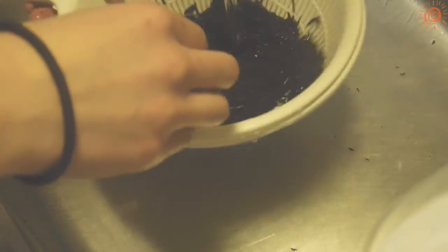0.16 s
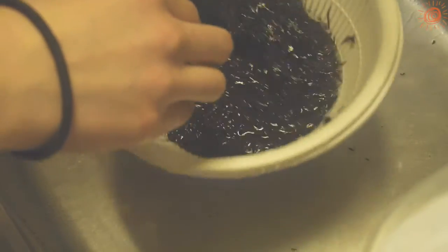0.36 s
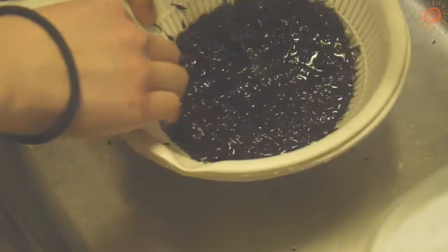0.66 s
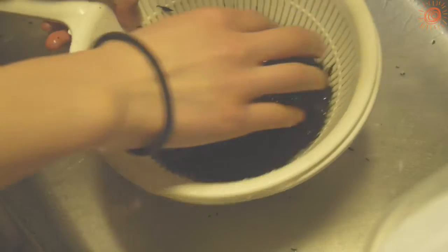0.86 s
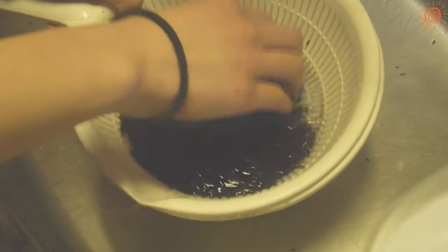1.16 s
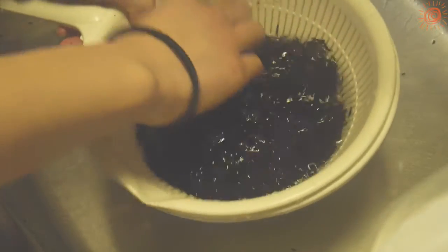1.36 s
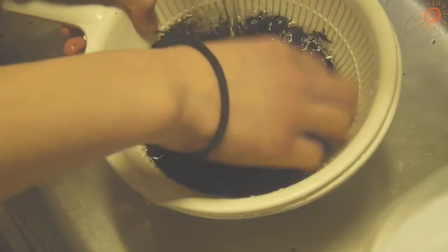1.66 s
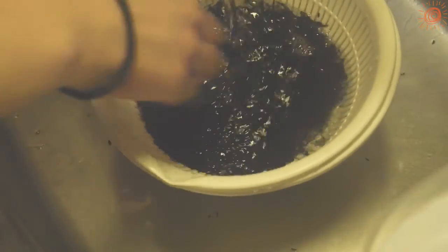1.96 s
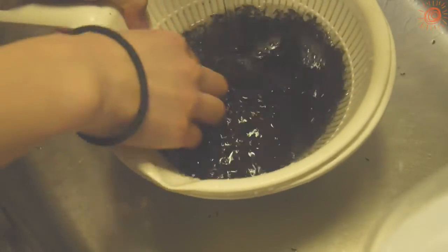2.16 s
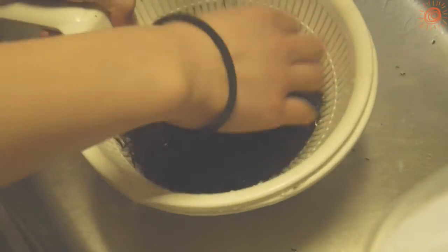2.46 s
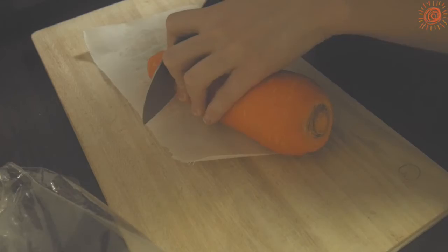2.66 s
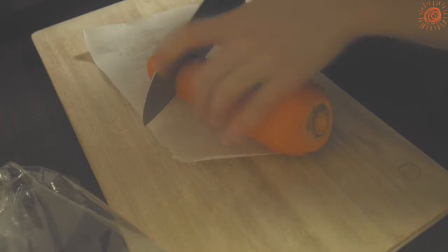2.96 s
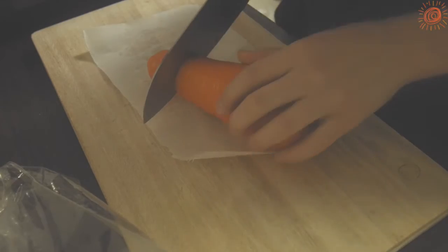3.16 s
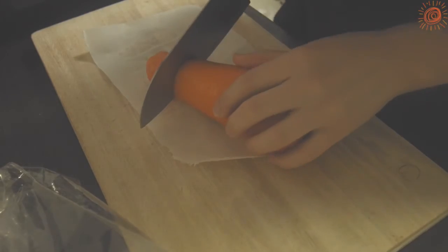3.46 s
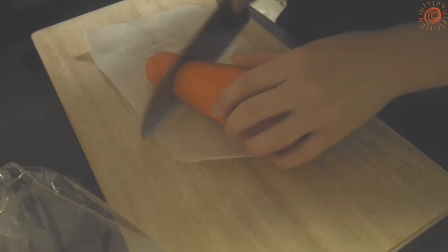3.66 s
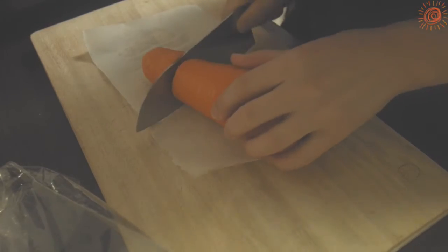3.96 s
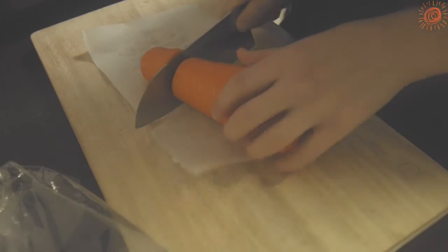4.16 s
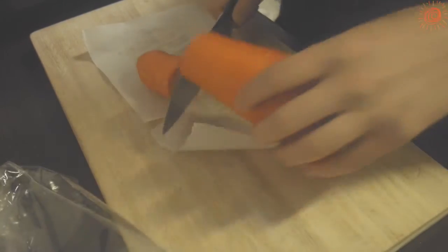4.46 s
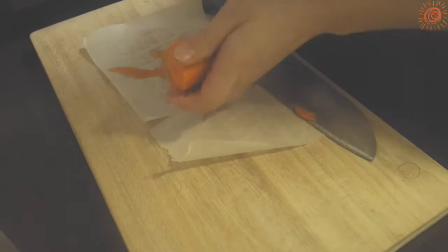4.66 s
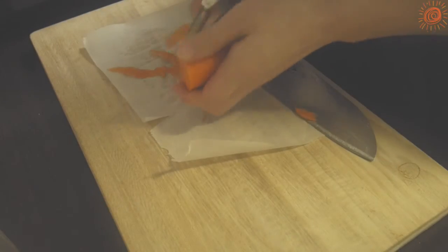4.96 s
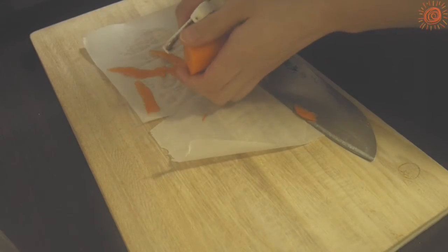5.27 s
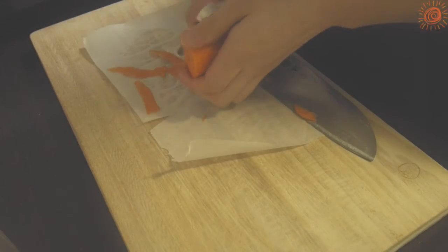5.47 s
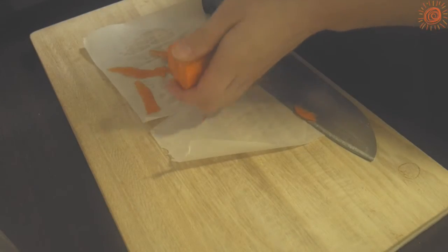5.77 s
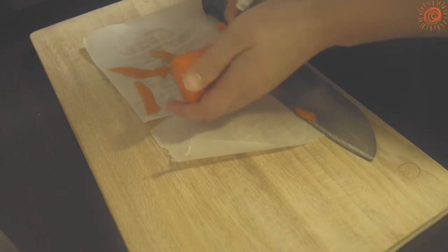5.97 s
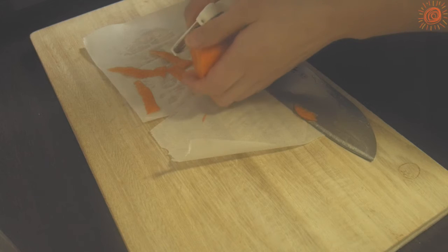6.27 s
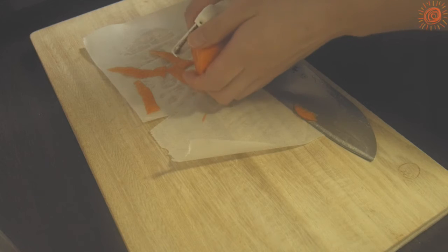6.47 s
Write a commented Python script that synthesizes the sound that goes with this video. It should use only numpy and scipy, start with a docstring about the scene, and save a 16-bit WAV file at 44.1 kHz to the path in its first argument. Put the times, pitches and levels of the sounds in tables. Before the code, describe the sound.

Bright running water in a metal basin stops abruptly; one hard carrot chop on a wooden board, paper rustle, then small peeling clicks over faint hum.

```python
"""At a steel sink a tap streams through a plastic colander; the scene then cuts to a quiet kitchen counter.
Close to the microphone a knife crunches through a carrot and slams on a wooden board, the carrot slides
over kitchen paper, and a small peeler scrapes and clicks. Behind them an appliance hums in the room.
Water is noise and tiny impacts through the basin's resonances, friction is shaped noise with a moving peak,
and contacts are noise bursts and decaying modes, with echoes from the walls."""
import sys
import numpy as np
from scipy import signal
from scipy.fft import rfft, irfft, next_fast_len
from scipy.io import wavfile
from scipy.ndimage import uniform_filter1d, map_coordinates

SR = 44100
rng = np.random.default_rng(int(sys.argv[2]) if len(sys.argv) > 2 else 0)


def store_wav(level_fs):
    """Save 16-bit WAV to argv[1]."""
    pcm = np.round(np.clip(np.atleast_2d(level_fs), -1, 1) * 32767)
    wavfile.write(sys.argv[1], SR, pcm.T.astype(np.int16))


N = 291060
TIME = np.arange(N) / SR
CUT_S = 2.5472  # the sink ends and the counter begins

# Clicks of peeler, knife and carrot:
# (time [s], crack level [dB], bright ring [Hz], body level against crack [dB], body [Hz])
CONTACTS = [(2.9612, -43, 9080, 1, 1910), (3.8816, -41.5, 5100, -6, 1210),
            (3.9998, -42.5, 4100, -17.5, 1550), (4.1552, -44, 4660, -6.5, 1800),
            (4.5995, -18, 5060, -14, 2230), (4.6076, -17.5, 6140, -15, 1540),
            (4.6109, -17.5, 7800, -12, 1490), (4.71, -32, 9000, -13, 1930), (4.7186, -42, 8930, -7.5, 2120),
            (4.7543, -44, 7200, -10.5, 2600), (5.0763, -33, 6140, -2.5, 1800), (5.084, -34, 7000, 0, 2130),
            (5.0973, -43.5, 6900, 5, 1900), (5.2053, -37.5, 3200, -1.5, 2020), (5.252, -54, 4100, 12, 2180),
            (5.2618, -49, 4130, 5, 2200), (5.2724, -38.5, 5200, -0.5, 1980),
            (5.3268, -48.5, 5770, -2, 2330), (5.461, -35.5, 4410, -4, 2080), (5.494, -29, 4300, -13, 2240),
            (5.601, -42, 4670, -3, 2170), (5.6196, -36, 8920, -7, 2340), (5.7305, -33, 6300, 5, 1700),
            (5.7365, -24, 3880, -12, 1580), (5.7386, -11.5, 7140, -14.5, 1540),
            (5.7455, -26, 7120, -12.5, 1560), (5.749, -33, 7220, -22, 1550), (5.7528, -24, 6900, -10, 1560),
            (5.7702, -33, 7050, -5, 2140), (6.196, -41.5, 6750, -10, 2030), (6.2914, -62.5, 3980, 12, 1890),
            (6.3744, -63, 5200, 13, 2130), (6.4315, -44, 6000, -2, 2010), (6.4352, -37, 5340, -5, 1820),
            (6.4467, -35, 5040, -0.5, 1840), (6.517, -42, 10300, -11, 2230), (6.545, -36, 5140, 1, 2220),
            (6.579, -40, 10500, -4.5, 2190)]


def amp(db):
    """dB to gain."""
    return 10 ** (np.asarray(db) / 20)


def unit(x):
    """x at rms 1."""
    return x / np.sqrt(np.mean(x ** 2) + 1e-20)


def along(points, hz):
    """Interpolate (Hz, value) points on a log frequency axis."""
    f, v = np.transpose(points)
    return np.interp(np.log(hz + 1), np.log(f + 1), v)


def filtered(x, response):
    """x through a response, real or complex, given as a function of frequency."""
    m = next_fast_len(N + SR // 2)
    return irfft(rfft(x, m) * response(np.fft.rfftfreq(m, 1 / SR)), m)[..., :N]


def left_lean(points):
    """Response of left and right that differ by the given (Hz, left minus right dB) points."""
    return lambda hz: amp(np.outer([.5, -.5], along(points, hz)))


def stereo(pair, side):
    """Left and right from a mid signal and a second one weighted by the side spectrum."""
    across = filtered(pair[1], lambda hz: amp(along(side, hz)))
    return np.array([pair[0] + across, pair[0] - across])


def noise(patchy_db):
    """Two unrelated noises sharing patches of random gain in time and frequency."""
    z = signal.stft(rng.standard_normal((2, N)), nperseg=512)[2]
    field = uniform_filter1d(rng.standard_normal(z.shape[1:]), size=6, axis=0)
    field = uniform_filter1d(field, size=10, axis=1)
    return unit(signal.istft(z * amp(patchy_db * unit(field)), nperseg=512)[1][:, :N])


def grains(per_s, spread_db):
    """Two unrelated trains of tiny impacts of uneven size."""
    hit = rng.random((2, N)) < per_s / SR
    sign = rng.choice([-1, 1], (2, N))
    size = amp(spread_db * np.clip(rng.standard_normal((2, N)), -2, 2))
    return unit(hit * sign * size)


def add(track, s, sound):
    """Mix a sound into a track at time s."""
    part = track[round(s * SR):][:len(sound)]
    part += sound[:len(part)]


def ring(hz, db, t60, attack=0.00013, glide=0):
    """One decaying mode, at most 1 s long, whose pitch may rise."""
    t = np.arange(int(min(t60, 1) * SR)) / SR
    tone = np.sin(2 * np.pi * hz * t * (1 + glide * t / t60))
    return amp(db - 60 * t / t60) * (1 - np.exp(-t / attack)) * tone


def burst(hz, db, t60, sharpness):
    """A dying puff of noise in one broad resonance."""
    t = np.arange(int(t60 * SR)) / SR
    b, a = signal.iirpeak(hz, sharpness, SR)
    once = signal.lfilter(b, a, rng.standard_normal(SR // 2))
    puff = unit(signal.lfilter(b, a, once))[-len(t):]
    return amp(db - 60 * t / t60) * (1 - np.exp(-.3 * t * hz)) * puff


def slopes(t, full_s, hold_s, rise_db_per_s, fall_db_per_s):
    """Gain that climbs to 1, holds and falls, straight in dB."""
    early = np.maximum(full_s - t, 0)
    late = np.maximum(t - full_s - hold_s, 0)
    return amp(-rise_db_per_s * early - fall_db_per_s * late)


def echo(x, longest):
    """x through two unrelated noise tails in which each frequency dies at its own speed."""
    # Decay of the walls: (frequency [Hz], t60 [s])
    wall_decay = [(100, 1), (600, 0.64), (2000, 0.46), (6000, 0.39), (14000, 0.26)]
    hz, t, z = signal.stft(rng.standard_normal((2, SR // 2)), SR, nperseg=256)
    t60 = np.minimum(along(wall_decay, hz), longest)[:, None]
    tail = signal.istft(z * amp(-60 * t / t60), SR, nperseg=256)[1]
    return signal.fftconvolve(x[None], tail / np.linalg.norm(tail[0]), axes=1)[:, :N]


def far_rattle():
    """Uneven taps blurred by noise and dulled by distance, faint and then fading."""
    from_s, level_db, fades_s, fade_db_per_s = 2.9, -63, 4.08, 30
    beats = np.cumsum(rng.uniform(.011, .024, 500))  # nearly sixty a second
    knocks = np.zeros((2, 13 * SR))
    knocks[:, (beats * SR).astype(int)] = amp(4 * rng.standard_normal(beats.shape))
    knocks = unit(knocks[:, :N]) + 1.1 * rng.standard_normal((2, N))
    dull = lambda f: (f < 3850) * (1.2 + 1 / (1 + ((f - 3000) / 450) ** 2)) * f / (f + 900)
    fade = (TIME > from_s) * slopes(TIME, 0, fades_s, 0, fade_db_per_s)
    return amp(level_db) * fade * unit(filtered(knocks, dull))


def kitchen_air():
    """Steady room noise, an appliance hum of narrow noise bands with thin motor tones, and the far rattle."""
    # Spectrum of the air: (frequency [Hz], relative level per Hz [dB])
    air_spectrum = [(25, -31.5), (60, -14.5), (110, -8), (170, -6.5), (300, -12), (500, -18.5), (700, -18),
                    (1100, -21.5), (1800, -26), (3000, -33.5), (6000, -37), (10000, -39), (12500, -47.5),
                    (15000, -63.5)]
    # Fuzzy appliance hum: (frequency [Hz], width [Hz], rms level [dB])
    hum_bands = [(152, 11, -58), (228.3, 8.4, -61)]
    # Steady motor tones: (frequency [Hz], rms level [dB])
    motor_tones = [(559.9, -64.5), (640.6, -70), (683.7, -69)]
    # Width of the room: (frequency [Hz], side against mid [dB])
    air_side = [(60, -17), (150, -20), (380, -9), (940, -9.5), (2360, -12), (5910, -4), (14800, -6)]
    air_db = -53

    air = filtered(noise(patchy_db=2.5), lambda f: amp(along(air_spectrum, f)))
    air *= amp(air_db) / np.std(air[0])
    for hz, width, db in hum_bands:
        band = lambda f: 1 / (1 + (2 * (f - hz) / width) ** 2)
        air += amp(db) * unit(filtered(rng.standard_normal((2, N)), band))
    for hz, db in motor_tones:
        air += amp(db) * unit(np.sin(2 * np.pi * (hz * TIME + rng.random((2, 1)))))
    air += far_rattle()
    return stereo(air, air_side) * np.clip((TIME - CUT_S) / .001, 0, 1)


def tap():
    """Droplets and hiss drum on the basin, which lifts its own resonances; a few bubbles pop."""
    # Water between the sink's resonances: (frequency [Hz], relative level per Hz [dB])
    spray_spectrum = [(25, -25), (80, -14), (170, -16.5), (300, -16), (420, -9.5), (1000, -5.5),
                      (1350, -8.5), (2100, -5), (3100, -13), (5000, -7), (8500, -3), (11000, -5.5),
                      (12600, -18), (13400, -49)]
    # Resonances of the steel basin: (frequency [Hz], width [Hz], relative level [dB])
    basin_modes = [(235, 17, 2.5), (417, 37, -10), (460, 53, -6.5), (591, 23, -1.5), (665, 16.7, 2.5),
                   (834, 26, 1.5), (985, 24, 0.5), (1144, 13, -1), (1726, 50, 4), (1894, 69, -4.5),
                   (1992, 41, -2.5), (2322, 100, -1), (3520, 110, 2), (3886, 48, 0.5), (4440, 46, 1),
                   (4764, 52, 3), (4804, 86, 3), (4950, 250, -1.5), (5320, 74, -2), (6100, 30, -10),
                   (6130, 210, -1), (6050, 220, 1), (6550, 94, -5), (7040, 45, 0.5), (7690, 100, 0),
                   (8400, 180, -21), (9300, 45, -11), (9990, 91, -1.5), (10900, 98, -5.5)]
    # Width of the sink: (frequency [Hz], side against mid [dB])
    sink_side = [(60, -19), (200, -17), (600, -18.5), (1200, -14), (2250, -67), (3600, -8.5), (5500, -16),
                 (8500, -5), (11500, -5.5), (13000, -31)]
    # Balance of the sink: (frequency [Hz], left minus right [dB])
    sink_left = [(60, 0.5), (130, -0.5), (290, 0.0), (640, -0.5), (1400, -1), (3070, -0.5), (6740, 0.5),
                 (14800, 1.5)]
    # Popping bubbles: (time [s], level [dB], pitch [Hz])
    pops = [(.169, -23, 1700), (1.009, -34, 2000), (1.334, -19, 2680), (1.342, -19, 2760),
            (1.646, -22, 3320), (1.652, -17.5, 2970), (1.664, -21.5, 3450), (1.701, -23, 754),
            (2.069, -21.5, 2430)]
    stream_db = -28.5
    stir_s, stir_width_s, stir_db = 1.55, 0.29, 0.73  # a slight swell as the hand stirs under the stream
    pop_t60_s, pop_glide = 0.017, 0.037  # life of a pop, share by which its pitch term rises
    splash_db, splash_t60_s = -1, .012  # broad splash with each pop, against its level

    drive = noise(patchy_db=0.97) + 0.43 * grains(per_s=1300, spread_db=7.0)
    walls = echo(drive[0], longest=0.14)  # the steel walls send the spray back and comb it finely
    drive = np.array([drive[0] + .5 * walls[0], 1.48 * drive[1] + 0.27 * walls[1]])

    def basin(f):
        peaks = sum(amp(2 * db) / (1 + (2 * (f - c) / w) ** 2) for c, w, db in basin_modes)
        return np.sqrt(amp(-2 * 8.95) + peaks)

    water = filtered(drive, lambda f: basin(f) * amp(along(spray_spectrum, f)))
    swell_db = stir_db * np.exp(-((TIME - stir_s) / stir_width_s) ** 2)
    water *= amp(stream_db + swell_db) / np.std(water[0])
    for s, db, hz in pops:
        add(water[0], s, ring(hz, db, pop_t60_s, attack=0.00055, glide=pop_glide))
        add(water[0], s, burst(hz, db + splash_db, splash_t60_s, sharpness=0.71))
    return filtered(stereo(water, sink_side), left_lean(sink_left)) * np.clip((CUT_S - TIME) / 0.0064, 0, 1)


def rubbing():
    """Friction noise: a bright hiss over a duller body, each with a broad peak, plus brief squeaks."""
    # Spectrum of the hiss: (frequency [Hz], relative level per Hz [dB])
    hiss_spectrum = [(1760, -30), (3000, -17), (3750, -4), (4730, 0), (5130, -2), (7350, -0.5), (7870, -3),
                     (10500, 1), (12700, -9), (15200, -33)]
    # Spectrum of the duller body: (frequency [Hz], relative level per Hz [dB])
    body_spectrum = [(350, -33.5), (600, -7.5), (1070, -8.5), (1200, 0), (1430, -7.5), (1620, -6),
                     (1800, -2), (3500, -7.5), (4550, -43.5), (7700, -120)]
    # The carrot dragged over the paper: (time [s], hiss level [dB], body level [dB])
    slide = [(4.2, -67, -68), (4.259, -44.5, -40), (4.32, -33, -49.5), (4.372, -45, -48.5),
             (4.424, -37.5, -43), (4.452, -37, -46), (4.492, -39.5, -49.5), (4.534, -37.5, -52),
             (4.594, -44.5, -44), (4.612, -50, -60)]
    # Short rubs of fingers, blade and peeler: (time of full level [s], rise [s], hold [s], hiss level [dB],
    # body level against hiss [dB], hiss peak [Hz], body peak [Hz])
    short_rubs = [(2.957, 0.068, 0.059, -60.5, -1, 8700, 1510), (3.112, 0.048, .005, -59, -13, 6740, 1390),
                  (3.496, 0.11, .005, -54, -2, 9160, 1470), (3.573, 0.045, .005, -55.5, -5, 9160, 1680),
                  (5.257, 0.022, 0.013, -64.5, 0, 6600, 2030), (5.459, .004, 0.0053, -56, -5, 5610, 2060),
                  (5.495, .006, 0.043, -43.5, -7, 5900, 2070), (5.666, 0.082, 0.069, -41, -7, 7750, 1740),
                  (6.552, 0.05, .004, -59.5, -4, 6530, 2300), (6.59, 0.014, 0.043, -58, -7, 6600, 2270)]
    # Narrow squeaks within the rubbing: (start [s], length [s], level [dB], pitch [Hz])
    squeaks = [(4.243, 0.044, -46, 895), (4.25, 0.084, -44, 4030), (4.4, .1, -48, 10700),
               (4.413, 0.068, -39, 7370), (4.41, .05, -45, 8850), (4.43, 0.084, -44, 5000),
               (4.54, 0.063, -47, 4420), (5.488, 0.081, -46.5, 2195), (4.598, .045, -49, 12700),
               (6.51, .055, -56, 10500), (6.538, .03, -43, 2260)]
    slide_hz, slide_hz_per_db, slide_body_hz = 7900, 190, 1870  # hiss peak at -44 dB, higher when louder
    rise_db, fall_db_per_s = 26.5, 345  # gained over a rub's rise; lost after its hold
    rustle_db, rustle_t60_s = -21.5, 0.11  # every click shakes a short rustle out of paper and peel

    friction = noise(patchy_db=3.0) + .5 * grains(per_s=3400, spread_db=7.5)
    hz, t, z = signal.stft(friction, SR, nperseg=256)

    def peaked(points, height, centre_hz, width_hz):
        peak = np.exp(-((hz[:, None] - centre_hz) / width_hz) ** 2)
        shape = amp(along(points, hz))[:, None] * (1 + height * peak)
        return unit(shape / np.linalg.norm(shape, axis=0))  # equally strong wherever the peak lies

    hiss = lambda peak_hz: peaked(hiss_spectrum, 0.59, peak_hz, width_hz=2800)
    body = lambda peak_hz: peaked(body_spectrum, 1.0, peak_hz, width_hz=1100)

    s, *columns = np.transpose(slide)
    hiss_db, body_db = [np.interp(t, s, c) for c in columns]
    bright_hz = slide_hz + slide_hz_per_db * (hiss_db + 44)
    gain = hiss(bright_hz) * amp(hiss_db) + body(slide_body_hz) * amp(body_db)
    gain *= (t >= s[0]) * (t <= s[-1])
    for s, rise, hold, db, body_db, peak_hz, body_hz in short_rubs:
        stroke = amp(db) * slopes(t, s, hold, rise_db / rise, fall_db_per_s)
        gain += (hiss(peak_hz) + amp(body_db) * body(body_hz)) * stroke
    for s, db, peak_hz, body_db, body_hz in CONTACTS:
        shake = amp(db + rustle_db - 60 * np.abs(t - s) / rustle_t60_s) * (t > s)
        gain += (hiss(peak_hz) + amp(body_db + 4.5) * body(body_hz)) * shake
    pair = signal.istft(z * gain, SR, nperseg=256)[1][:, :N]

    # stick and slip makes the level stutter
    slips = map_coordinates(rng.standard_normal(N // 300 + 4), [np.arange(N) / 300])
    pair *= unit(amp(1.3 * slips))
    for start, length, db, tone_hz in squeaks:
        swell = np.sin(np.pi * np.clip((TIME - start) / length, 0, 1))
        narrow = lambda f: 1 / (1 + ((f - tone_hz) / 45) ** 2)
        pair[0] += amp(db) * swell * unit(filtered(rng.standard_normal(N), narrow))
    return pair


def clicks():
    """Each contact is a crack of noise, a bright scratch and a lower knock; set-downs are soft thuds."""
    # Soft set-downs on the board: (time [s], level [dB], pitch [Hz], t60 [s])
    set_downs = [(3.687, -29.5, 125, 0.065), (4.342, -31, 313, 0.076), (4.36, -34.5, 388, 0.063),
                 (5.205, -35.5, 350, 0.05), (5.213, -38.5, 484, 0.034), (5.63, -41.5, 109, 0.18),
                 (6.2, -43.5, 160, 0.079)]
    crack_t60_s, knock_t60_s = .013, .032
    scratch_db, scratch_t60_s = -7, .022  # level against the crack
    top_hz = 9900

    cracks, knocks, t = np.zeros(N), np.zeros(N), np.arange(SR // 10) / SR
    for s, db, hz, body_db, body_hz in CONTACTS:
        envelope = amp(db - 60 * t / crack_t60_s) * (1 - np.exp(-t / 0.0013))
        add(cracks, s, envelope * rng.standard_normal(len(t)))
        add(knocks, s, burst(hz, db + scratch_db, scratch_t60_s, sharpness=7.1))
        add(knocks, s, burst(body_hz, db + body_db, knock_t60_s, sharpness=6.9))
    for s, db, hz, t60 in set_downs:
        add(knocks, s, ring(hz, db, t60, attack=0.0013))
    crisp = lambda f: 1j * f / (2200 + 1j * f)
    soft_top = lambda f: 1 / (1 + 1j * f / top_hz - (f / top_hz) ** 2) ** 2
    return filtered(knocks + filtered(cracks, crisp), soft_top)


def chop():
    """The carrot's fibres tear in a rising crunch, and the blade strikes the board, setting its modes ringing."""
    # Spectrum of tearing fibres: (frequency [Hz], relative level per Hz [dB])
    fibre_spectrum = [(180, -32.5), (300, -1), (1100, -8), (1950, 4.5), (2850, -1.5), (4750, -6),
                      (5980, -5.5), (6930, -3.5), (10100, -3), (13500, -15.5), (15200, -28)]
    # Modes of board and counter: (frequency [Hz], level [dB], t60 [s])
    board_modes = [(96, -20, 0.1), (224, -15.5, 0.073), (279, -18.5, 0.09), (362, -22.5, 0.14),
                   (163, -26.5, 0.31), (461, -8.5, 0.059), (571.5, -19, 0.27), (641, -24, 0.26),
                   (897, -18, 0.033), (1210, -5.5, 0.021), (1540, -11, 0.019), (2006, 5, 0.0052),
                   (2470, -7, 0.0067), (3630, -29, .008), (4700, -11, 0.011), (6180, -13, .006)]
    # A metal vessel on the counter rings on until touched:
    # (frequency [Hz], level [dB], t60 [s], time of the touch [s])
    pan = (344.5, -39.5, 2.44, 4.5)
    strike_s = 3.7115
    tear_s, tear_db, tear_db_per_s = 3.686, -38, 645.5  # the blade bites and speeds up through the carrot
    snap_s, snap_db, snap_t60_s = 3.7125, -18, 0.0092  # last fibres snap
    settle_db, settle_t60_s = -26.5, .085  # halves settle

    tear = (grains(per_s=4200, spread_db=0.5) + rng.standard_normal((2, N)))[0]
    cut = amp(tear_db + tear_db_per_s * (snap_s - tear_s))
    cut = cut * slopes(TIME, snap_s, 0, tear_db_per_s, 60 / snap_t60_s)
    cut *= np.clip(1 + (TIME - tear_s) / .004, 0, 1)
    from_snap = np.abs(TIME - snap_s)
    snap = amp(snap_db - 60 * from_snap / snap_t60_s)
    settle = amp(settle_db - 60 * from_snap / settle_t60_s) * (TIME > snap_s)
    sound = (cut + snap + settle) * unit(filtered(tear, lambda f: amp(along(fibre_spectrum, f))))

    for k, (hz, db, t60) in enumerate(board_modes):
        direction = (-1) ** k  # neighbouring modes start in opposite directions
        add(sound, strike_s, direction * ring(hz, db, t60, attack=0.00018))
    # the counter's dense modes blur into a woody rumble
    add(sound, strike_s + .004, burst(580, -22.5, .3, sharpness=1.8))
    add(sound, strike_s + .004, burst(1700, -38, 0.3, sharpness=0.67))

    hz, db, t60, touched_s = pan
    vessel = ring(hz, db, t60, attack=.04)
    since_touch = np.maximum(strike_s + np.arange(len(vessel)) / SR - touched_s, 0)
    add(sound, strike_s, vessel * amp(-150 * since_touch))
    return filtered(sound, lambda f: (1j * f / (75 + 1j * f)) ** 3)  # a small board radiates no deep bass


def scene():
    """Close sounds reach both microphone ports, mostly stronger on the left; the walls answer."""
    # Width of the close sounds: (frequency [Hz], side against mid [dB])
    close_side = [(60, -18), (150, -23.5), (400, -11), (1100, -13.5), (2200, -26), (4000, -7), (8000, -7.5),
                  (14000, -2.5)]
    # Balance of the close sounds: (frequency [Hz], left minus right [dB])
    close_left = [(60, 1), (150, 1), (380, 3), (940, -0.5), (2360, 0.5), (5910, 2), (14800, 4.5)]
    blow, ticks, rub = chop(), clicks(), rubbing()
    hits = blow + ticks
    smeared = echo(hits, longest=.006)[0]  # nearby objects scatter a smeared copy
    near = np.array([hits + rub[0], smeared + rub[1]])
    # the walls answer 300 samples (7 ms) later
    far = amp(-17) * echo(np.roll(blow, 300), longest=1)
    far += amp(-17.5) * echo(np.roll(ticks + rub[0], 300), longest=1)
    return tap() + kitchen_air() + filtered(stereo(near + far, close_side), left_lean(close_left))


def record(dry):
    """The housing cuts narrow notches, the input clips at full scale, and a steep filter limits the band."""
    # Notches of the microphone housing: (frequency [Hz], width [Hz], depth [0-1])
    notches = [(7820, 130, 0.8), (9000, 200, 0.2)]
    top_hz = 15400

    def housing(f):
        cuts = [1 - np.clip(depth, 0, 1) / (1 + ((f - hz) / width) ** 2) for hz, width, depth in notches]
        return np.prod(cuts, axis=0)

    clipped = np.clip(filtered(dry, housing), -1, 1)
    return filtered(clipped, lambda hz: 1 / (1 + (hz / top_hz) ** 300))


dry = scene()
out = record(dry)
store_wav(out)
```